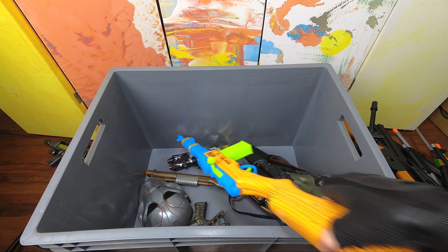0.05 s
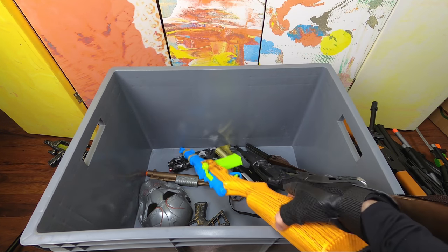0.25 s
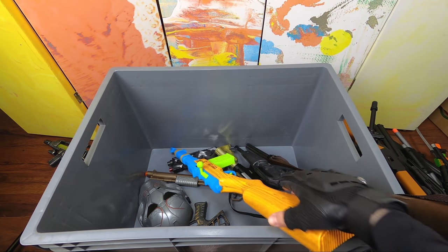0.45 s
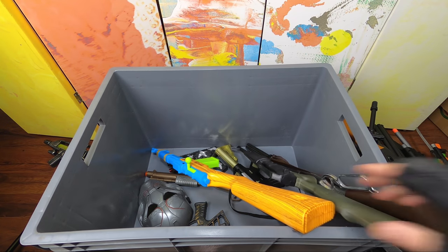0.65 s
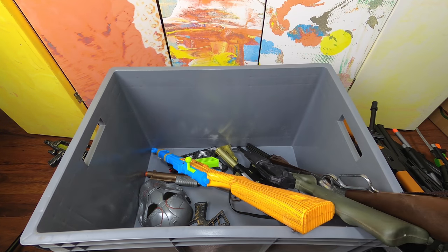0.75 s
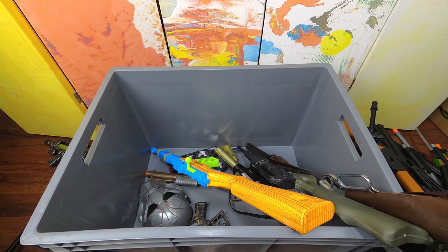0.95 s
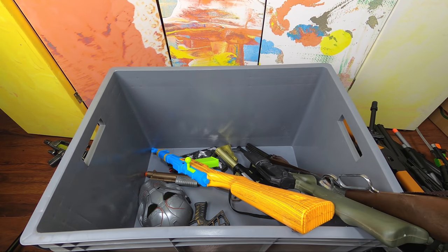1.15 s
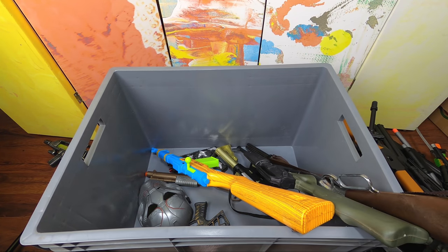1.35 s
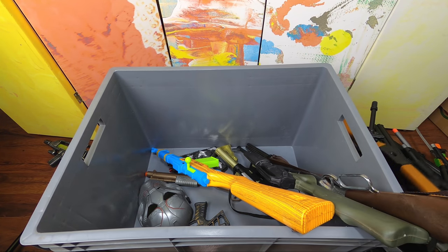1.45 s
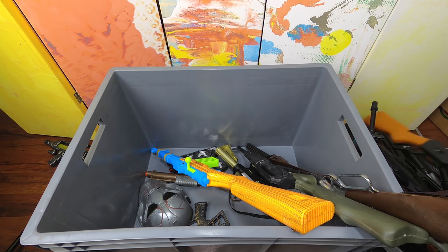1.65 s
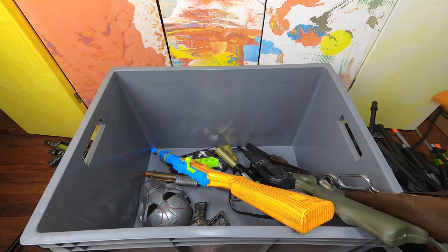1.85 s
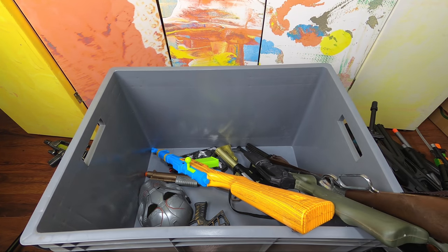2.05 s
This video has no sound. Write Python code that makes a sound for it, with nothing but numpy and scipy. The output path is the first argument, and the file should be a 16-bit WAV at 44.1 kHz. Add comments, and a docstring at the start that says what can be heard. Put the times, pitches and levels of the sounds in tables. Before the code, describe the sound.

A hollow plastic toy rifle lands on others in a big plastic crate: faint ticks at first, loud bright clacks and deep boomy thuds from 0.24 to 0.45 seconds, then bouncing knocks from 0.54 until about 0.9. The small bare room rings out. Quieter, duller rattles from a pile come around 1.35-1.6, then faint ticks to 2.1, over low wavering hum and soft air noise.

```python
"""A hollow plastic toy rifle is dropped on others in a big plastic crate, clatters, bounces and settles; then the
next one is lifted from a pile beside it. Each knock is a short chatter of contacts that rings the thin shells.
Each landing is a smooth push that booms in the crate walls. A small bare room rings behind, over a low wavering
hum and faint air noise. A close stereo microphone flattens the loudest peaks."""
import sys
import numpy as np
from scipy import signal
from scipy.fft import rfft, irfft
from scipy.io import wavfile

SR = 44100
rng = np.random.default_rng(int(sys.argv[2]) if len(sys.argv) > 2 else 0)


def digitize_waveform(pressure):
    """Quantize a signal to 16-bit integers and store it at the path in sys.argv[1].

    Rows of a 2-D input are taken as channels; values are limited to [-1, 1].
    """
    field = np.atleast_2d(pressure).T
    bounded = np.clip(field, -1, 1)
    quanta = np.round(bounded * 32767).astype(np.int16)
    wavfile.write(sys.argv[1], SR, quanta)


N = 92610  # samples, 2.1 s


def undb(db):
    """Turn decibels into a plain gain."""
    return 10 ** (np.asarray(db) / 20)


def level(x, db):
    """Scale a sound to an rms level in dB."""
    return x * undb(db) / np.sqrt(np.mean(x ** 2))


def ring(hz, gain, t60, length_s):
    """Sum of sine modes after one tap; each falls by 60 dB in its own t60 (seconds)."""
    t = np.arange(int(length_s * SR))[:, None] / SR
    modes = np.sin(2 * np.pi * hz * t) * np.exp(-np.log(1000) * t / t60)
    return modes @ gain


def add(out, x, start_s):
    """Mix x into out from a start time, cutting what runs past the end."""
    i = int(start_s * SR)
    out[..., i:i + x.shape[-1]] += x[..., :N - i]


def toy_knocks():
    """The toy clatters on the others in the crate: quick, tight chatters of contacts."""
    # One row per knock: start_s, middle_ring_db, low_ring_db, high_ring_db, middle_pitch_hz (dB are relative)
    crate_hits = [(0.0254, -40.5, -81, -46, 2370), (0.0374, -36.5, -75, -33, 4800),
                  (0.0995, -52, -67, -63, 2700), (0.1822, -30, -85, -27.5, 2365),
                  (0.2404, -5, -12.5, -5, 3950), (0.2445, -8.5, -21, -26, 2170),
                  (0.3196, 1.5, -13, -4, 4190), (0.3345, -5.5, -9, -14, 4260), (0.346, -3, -3.5, -35, 3000),
                  (0.3595, -6, -1.5, -21, 4270), (0.3832, -7, -13.5, -15.5, 1536),
                  (0.4387, -8.5, -22.5, -14, 2070), (0.5396, -19, -43, -35, 1560),
                  (0.5541, -16.5, -10, -19, 1290), (0.5885, -4.5, -2.5, -34, 1010),
                  (0.5945, -3, -8, -11, 2170), (0.6532, -10.5, -11, -12, 2900),
                  (0.6625, -9, -16.5, -31, 1600), (0.6816, -2, -4, -35, 1420),
                  (0.716, -9.5, -25, -16.5, 4440), (0.7542, -1, -8, -11, 3130),
                  (0.7585, -8, -10.5, -11.5, 1650), (0.7824, -11, -1, -38, 1520),
                  (0.8568, -14.5, -19.5, -15, 1440), (0.8712, -13.5, -56, -29, 2130)]
    return knocks(crate_hits, rise_s=.0006, decay_s=0.0046, main_contact=1.25, pan_db=2)


def pile_knocks():
    """The next toy is lifted from the pile: its contacts build up and die away more slowly."""
    # One row per knock: start_s, middle_ring_db, low_ring_db, high_ring_db, middle_pitch_hz (dB are relative)
    pile_hits = [(1.2563, -35.5, -64, -36, 2023), (1.3156, -34.5, -58, -97, 1480),
                 (1.352, -24, -27.5, -34.5, 1490), (1.4463, -25, -27, -40, 1800),
                 (1.4665, -14, -29, -35, 1490), (1.478, -13.5, -12, -32, 970),
                 (1.5103, -15.5, -8.5, -20, 867), (1.5395, -21, -27.5, -52, 2800),
                 (1.569, -17, -45, -40, 990), (1.7946, -34, -77, -43, 2050), (1.8482, -36, -62, -55, 1420),
                 (1.8786, -30.5, -50.5, -42, 1330), (1.9444, -40.5, -39, -69, 1180),
                 (2.0566, -38.5, -74, -67, 1370), (2.0768, -33, -71, -44, 1790)]
    return knocks(pile_hits, rise_s=0.0033, decay_s=0.01, main_contact=0.79, pan_db=3)


def knocks(table, rise_s, decay_s, main_contact, pan_db):
    """Each knock rings the shells with fresh mode strengths; pan_db is left minus right."""
    out = np.zeros((2, N))
    for start_s, mid_db, low_db, high_db, mid_hz in table:
        hz, db, t60 = shell_modes(mid_db, low_db, high_db, mid_hz)
        sides = shell_ring(hz, db, t60)
        taps = chatter(rise_s, decay_s, main_contact)
        knock = signal.fftconvolve(sides, taps[None])
        add(out, knock * undb([[pan_db / 2], [-pan_db / 2]]), start_s)
    return out


def shell_modes(mid_db, low_db, high_db, mid_hz):
    """A thin shell has a few main modes and many fine ones; higher modes die sooner."""
    # Pitches of the main shell modes: pitch_hz
    shell_hz = np.array(np.array([540, 750, 990, 1290, 1500, 2150, 2850, 3950, 4330]))
    fine_modes, fine_db, fine_top_fall_db = 220, -1, -11.5  # count; dB; dB per octave above high_hz
    shell_t60_s, fine_t60_s = .025, 0.013  # at 1 kHz
    low_hz, middle_hz, high_hz = 600, np.array([1400, 4400]), 6500
    tilt_db = 2  # fall per octave away from the middle pitch
    peak_db, peak_octaves = 8, .12  # modes near the middle pitch stand out

    # Fine modes are spread evenly in octaves from 200 Hz to 15 kHz, one at random in each slot
    slots = (np.arange(fine_modes) + rng.random(fine_modes)) / fine_modes
    fine_hz = 200 * (15000 / 200) ** slots
    main_hz = shell_hz * (1 + .015 * rng.standard_normal(len(shell_hz)))
    hz = np.r_[main_hz, fine_hz]

    octaves_above = np.log2(np.maximum(fine_hz / high_hz, 1))
    db = np.r_[0 * shell_hz, fine_db + fine_top_fall_db * octaves_above]
    middle_db = mid_db - tilt_db * np.abs(np.log2(middle_hz / mid_hz))
    curve_hz = [low_hz / 2, low_hz, *middle_hz, high_hz]
    curve_db = [low_db - 7.5, low_db, *middle_db, high_db]
    db = db + np.interp(np.log(hz), np.log(curve_hz), curve_db)
    db = db + peak_db * np.exp(-(np.log2(hz / mid_hz) / peak_octaves) ** 2)

    t60 = np.r_[np.full(len(shell_hz), shell_t60_s), np.full(fine_modes, fine_t60_s)]
    return hz, db, t60 * (1000 / hz) ** .4


def shell_ring(hz, db, t60):
    """Each mode gets a random strength and sign, and reaches left and right in its own proportion."""
    # How the left microphone port differs from the right: pitch_hz, left_minus_right_db
    ports = np.array([(1000, -1.5), (2500, 3), (5000, 1), (9000, -9.5)])
    scatter_db = 2
    wide_hz = 8000  # left and right differ more and more toward and above this pitch

    size, way, sign = rng.standard_normal((3, len(hz)))
    gain = undb(db + scatter_db * size - 13) * np.sign(sign)
    share = np.tanh(way) * hz / (hz + wide_hz)
    port_db = np.interp(np.log(hz), np.log(ports[:, 0]), ports[:, 1])
    share = share + np.tanh(np.log(undb(port_db)) / 2)  # dB difference as a left/right share
    sides = ring(hz, np.array([gain * (1 + share), gain * (1 - share)]).T, t60, .05).T
    # The blow sets the energy, however the modes happen to add up
    energy = np.sum(gain ** 2 * t60) * SR / np.log(1e6)
    return sides * np.sqrt(energy / np.sum(sides ** 2))


def chatter(rise_s, decay_s, main_contact):
    """Random contacts swell and die away, then loose parts shake on, a few ticks standing out."""
    contacts_per_s = 3000
    rattle, rattle_s, rattle_spread_db = 0.17, 0.043, 3.5  # gain, decay, spread of the ticks

    t = np.arange(5000) / SR
    rise = 1 - np.exp(-(t + 1 / SR) / rise_s)
    tick_size = undb(rattle_spread_db * (rng.exponential(size=len(t)) - 2))
    loose_parts = rattle * np.exp(-t / rattle_s) * tick_size
    shape = rise * (np.exp(-t / decay_s) + loose_parts)
    hits = rng.random(len(t)) < contacts_per_s / SR
    taps = hits * rng.standard_normal(len(t)) * shape
    taps[int(rise_s * SR)] = main_contact  # one sure contact, relative to the random ones
    return taps / np.sqrt(np.sum(taps ** 2))


def crate():
    """Each landing is a smooth push on the walls and floor boards; a longer push sounds duller."""
    # Landings felt by the crate and the floor: start_s, level_db (relative), push_length_s
    thuds = [(.241, -16, 0.0051), (0.292, -19, 0.0031), (0.332, -3.5, 0.0022), (0.404, -9.5, 0.0021),
             (0.549, -21.5, 0.0052), (0.59, -13.5, 0.001), (.655, -13, 0.0033), (0.701, -11, 0.0028),
             (0.759, -11.5, 0.00051), (.785, -11, 0.00273), (0.809, -8.5, 0.0025), (0.875, -21.5, 0.00096),
             (0.943, -14, 0.0055), (1.191, -21.5, 0.012), (1.353, -29.5, 0.0022), (1.404, -30.5, 0.0025)]
    # Modes of the crate walls and floor boards: pitch_hz, level_db (relative), t60_s
    wall_modes = [(49.4, -11, 0.87), (75.23, -5, 0.99), (85, -7.5, 0.27), (102.36, 2, 0.54),
                  (129.6, -2.5, 0.49), (148.7, -8.5, 0.25), (166.9, 2.5, 0.15), (197.3, -3.5, 0.25),
                  (229.6, -7, 0.27), (260.7, -5, 0.34), (295.1, -9, 0.37), (333, -13.5, 0.12),
                  (391.2, -9.5, 0.16)]

    force = np.zeros(N)
    for start_s, push_db, length_s in thuds:
        push = np.hanning(max(int(length_s * SR), 8))
        add(force, undb(push_db) * push / push.sum(), start_s)
    hz, db, t60 = np.array(wall_modes).T
    gain = undb(db - 2.5) * (-1) ** np.arange(len(hz))  # neighbouring modes have opposite signs
    return signal.fftconvolve(force, ring(hz, gain, t60, 0.81))[:N]


def room(x):
    """Dense echoes: noise in octave bands, each dying at its own rate; left and right part in the treble."""
    t60_at_1khz_s, damp = 0.52, 0.009  # damp: t60 falls as this power of pitch
    wide_hz, rise_s = 1420, 0.00063

    t, tail = np.arange(SR) / SR, 0
    for hz in 60 * 2. ** np.arange(8):
        edges = signal.butter(2, [hz / 2 ** .5, hz * 2 ** .5], "band", fs=SR, output="sos")
        mid, side = signal.sosfilt(edges, rng.standard_normal((2, SR)))
        t60 = t60_at_1khz_s * (1000 / hz) ** damp
        pair = mid + side * hz / (hz + wide_hz) * np.array([[1], [-1]])
        # Dividing by the decay's own size keeps long and short tails equally strong
        tail = tail + pair * np.exp(-np.log(1000) * t / t60) / np.sqrt(t60 * SR / np.log(1e6))
    tail = tail * (1 - np.exp(-t / rise_s))
    return signal.fftconvolve(tail, x[None])[:, :N]


def hum():
    """Low hum, alike on both sides: narrow bands of noise, which waver like unsteady tones."""
    # Bands of the hum: pitch_hz, level_db (rms)
    hum_bands = [(70.0, -53), (102.3, -46.5), (177.6, -67.5), (209.9, -61)]
    return sum(undb(db) * band(hz, width_hz=9) for hz, db in hum_bands)


def band(hz, width_hz):
    """Noise through one resonance at rms 1, leaving out the filter's start-up."""
    b, a = signal.iirpeak(hz, hz / width_hz, fs=SR)
    return level(signal.lfilter(b, a, rng.standard_normal(2 * N))[N:], 0)


def room_air():
    """Faint steady noise, shaped in pitch and partly different on the two sides."""
    # Colour of the air noise: pitch_hz, level_db (relative)
    air_hz, air_db = np.array([(150, -37), (250, -44), (1250, 5), (1760, 8.5), (2570, 8), (3320, 9),
                               (15000, -18.5)]).T
    f = np.maximum(np.fft.rfftfreq(N, 1 / SR), 1)
    shape = undb(np.interp(np.log(f), np.log(air_hz), air_db, left=-40))
    mid, side = irfft(rfft(rng.standard_normal((2, N))) * shape, N)
    return level(mid + 0.79 * side * np.array([[1], [-1]]), -55)


def scene():
    """Toys, crate boom and pile, each sent to the room at its own level, over hum and air."""
    room_db, pile_room_db, crate_room_db = -4, -1, -3.5
    toys, pile, boom = toy_knocks(), pile_knocks(), crate()
    feed = undb(room_db) * toys.mean(axis=0) + undb(pile_room_db) * pile.mean(axis=0)
    feed = feed + undb(crate_room_db) * boom
    out = toys + pile + boom + room(feed) + hum() + room_air()
    return np.array([np.roll(out[0], 1), out[1]])  # left lags by one sample


def record(dry):
    """The microphone drops the deepest bass, the loudest peaks flatten at a ceiling and the top is cut."""
    bass_cut_hz, ceiling, top_hz = 48, .97, 15300
    x = signal.sosfilt(signal.butter(2, bass_cut_hz, "high", fs=SR, output="sos"), dry)
    soft = x / (1 + np.abs(x / ceiling) ** 8) ** (1 / 8)
    return signal.sosfilt(signal.ellip(10, .2, 80, top_hz, fs=SR, output="sos"), soft)


dry = scene()
out = record(dry)
digitize_waveform(out)
```